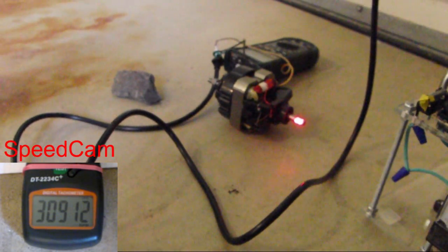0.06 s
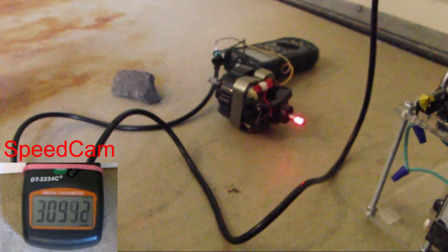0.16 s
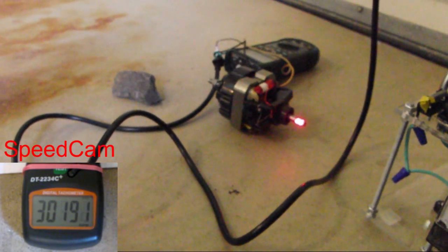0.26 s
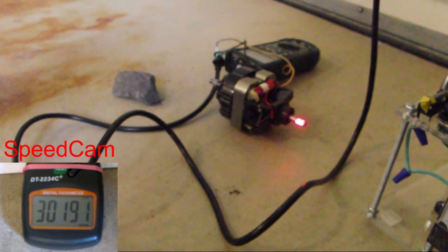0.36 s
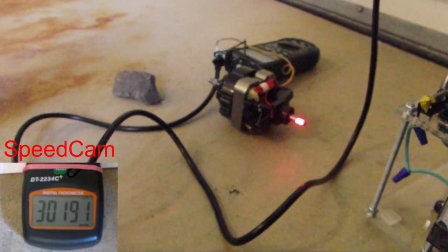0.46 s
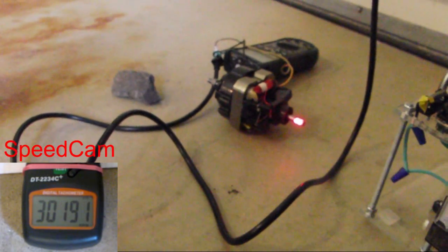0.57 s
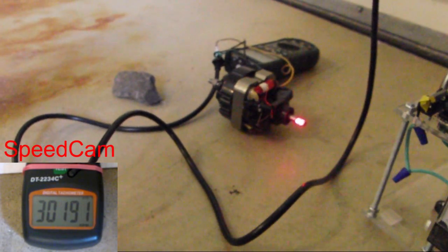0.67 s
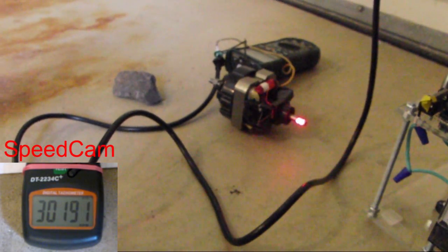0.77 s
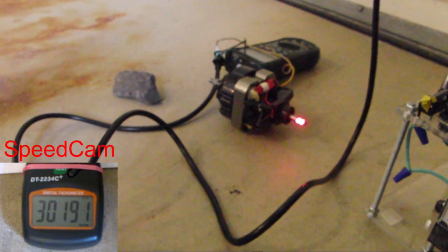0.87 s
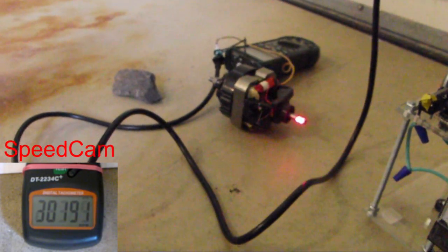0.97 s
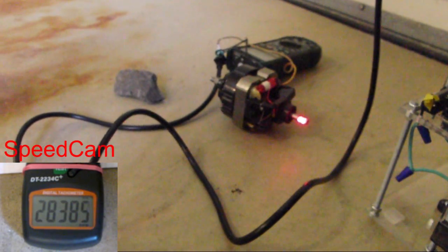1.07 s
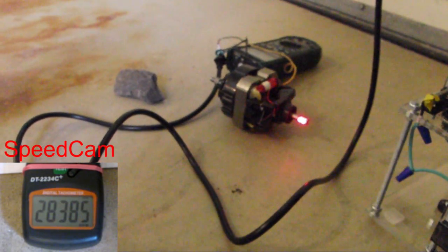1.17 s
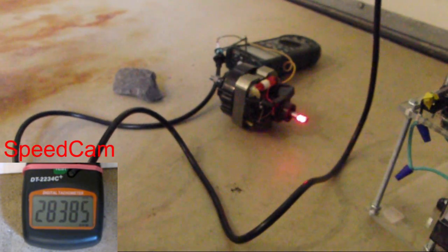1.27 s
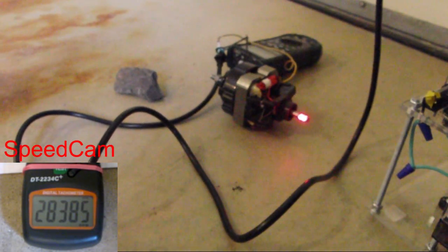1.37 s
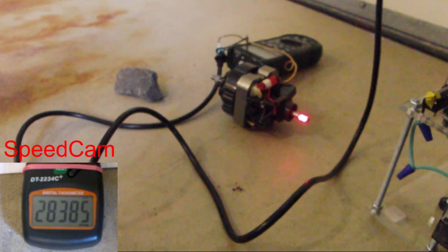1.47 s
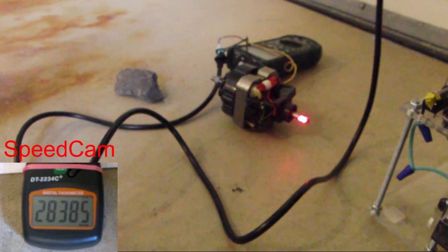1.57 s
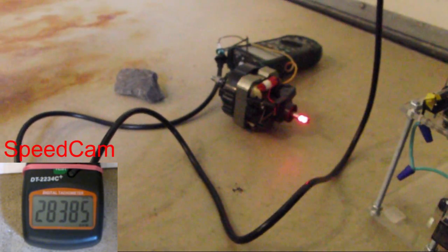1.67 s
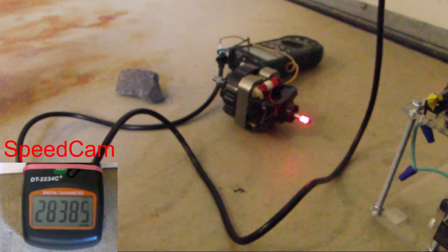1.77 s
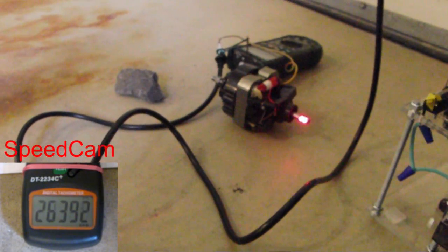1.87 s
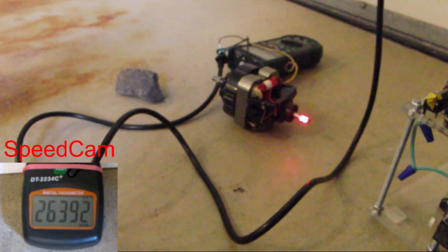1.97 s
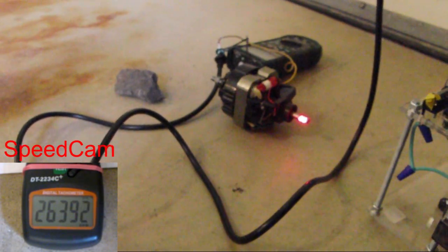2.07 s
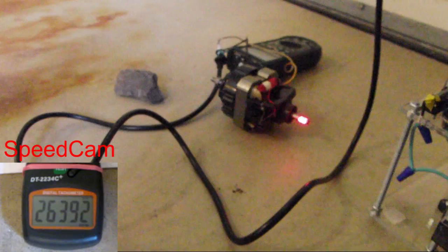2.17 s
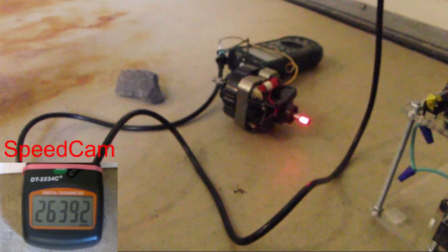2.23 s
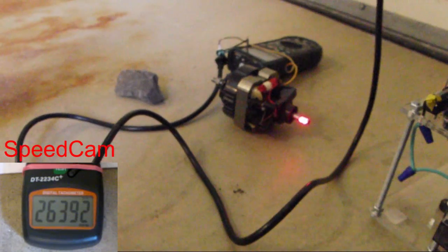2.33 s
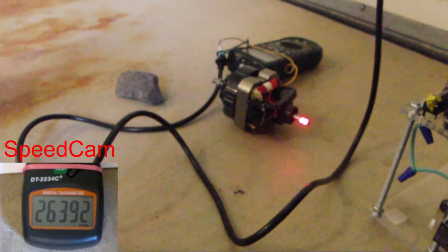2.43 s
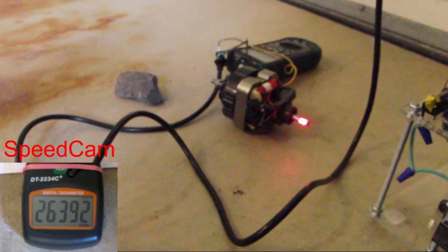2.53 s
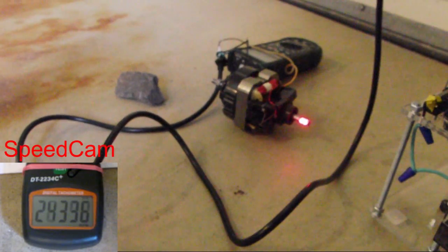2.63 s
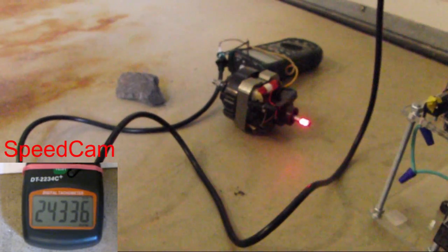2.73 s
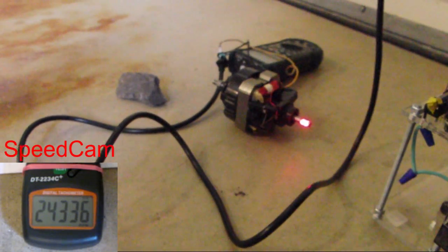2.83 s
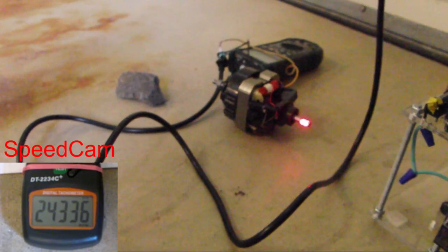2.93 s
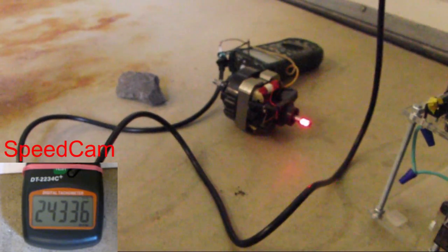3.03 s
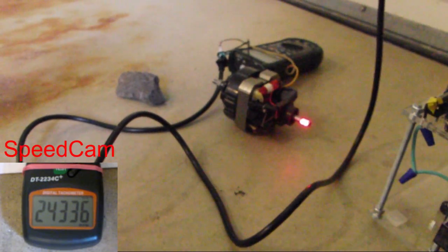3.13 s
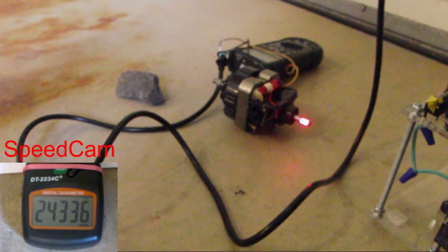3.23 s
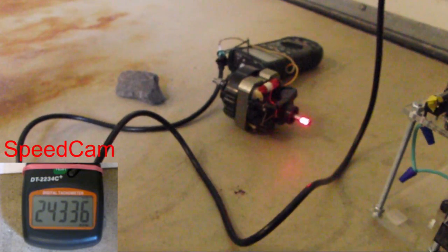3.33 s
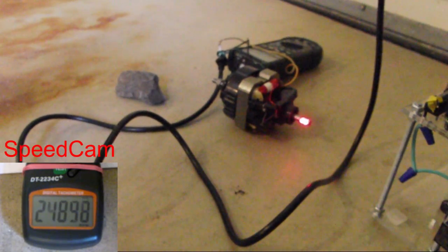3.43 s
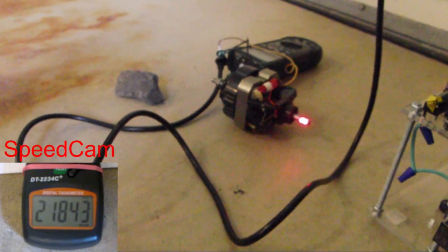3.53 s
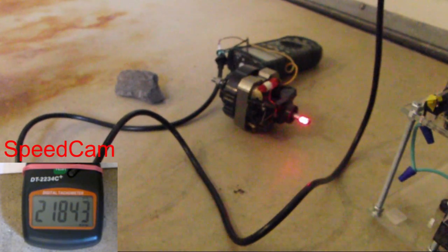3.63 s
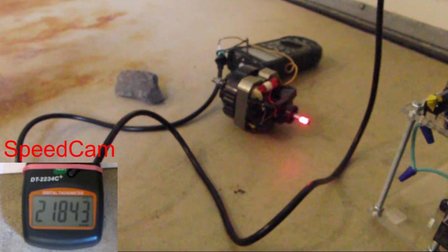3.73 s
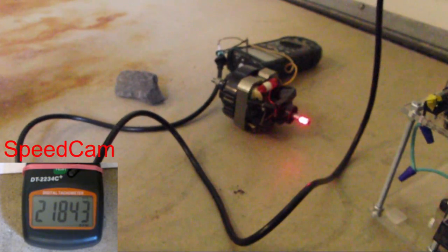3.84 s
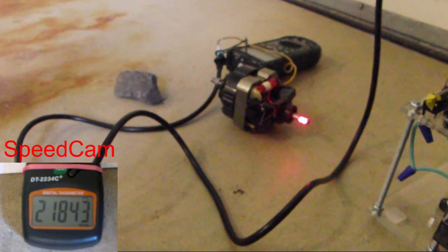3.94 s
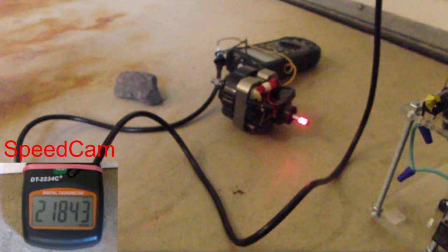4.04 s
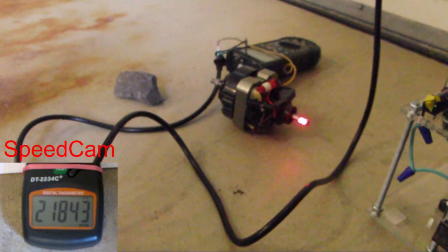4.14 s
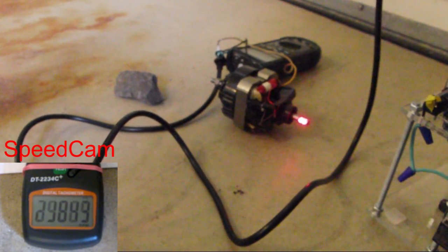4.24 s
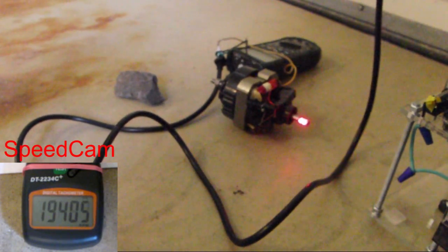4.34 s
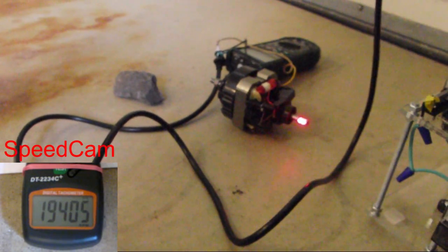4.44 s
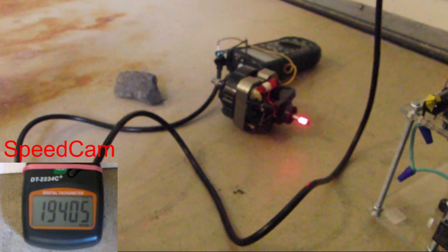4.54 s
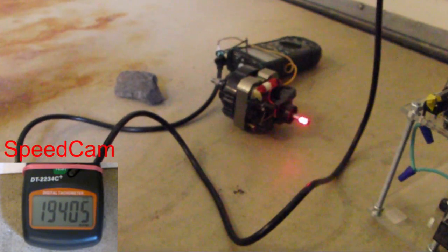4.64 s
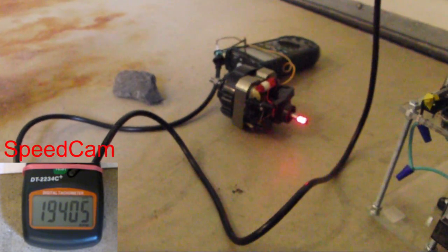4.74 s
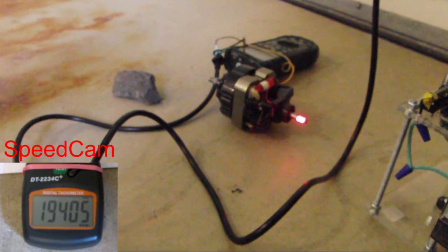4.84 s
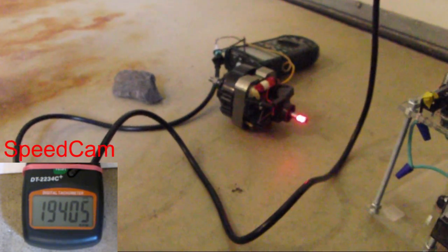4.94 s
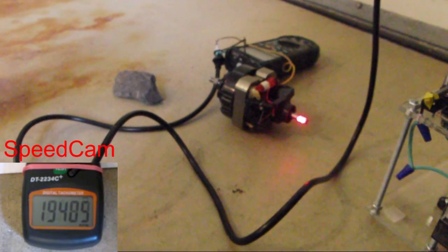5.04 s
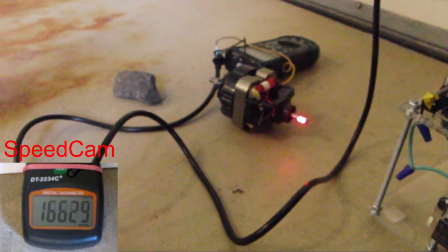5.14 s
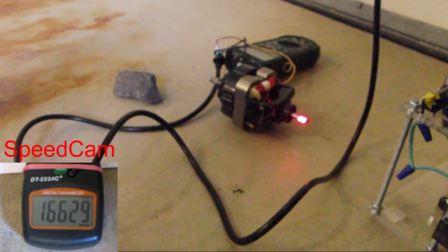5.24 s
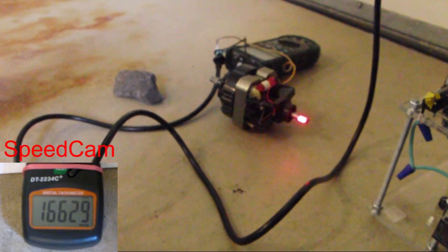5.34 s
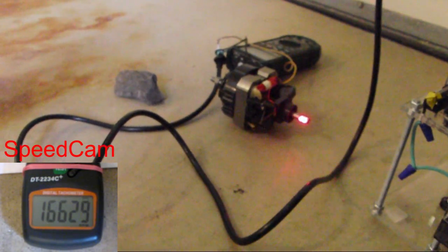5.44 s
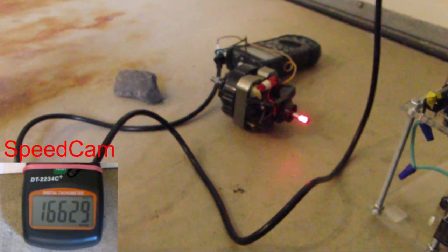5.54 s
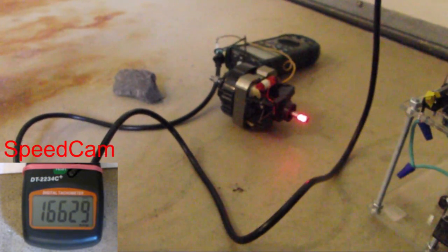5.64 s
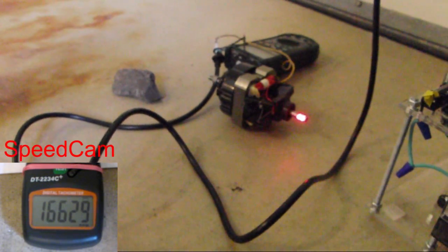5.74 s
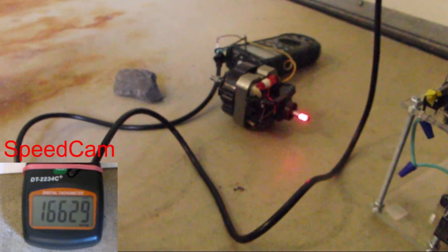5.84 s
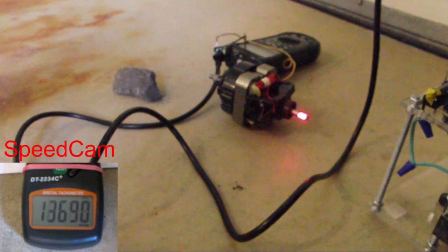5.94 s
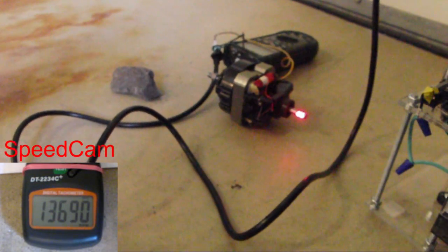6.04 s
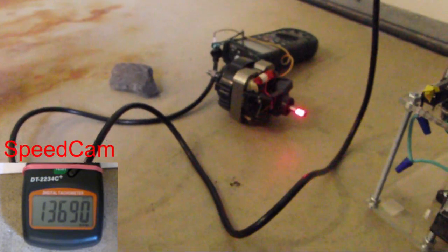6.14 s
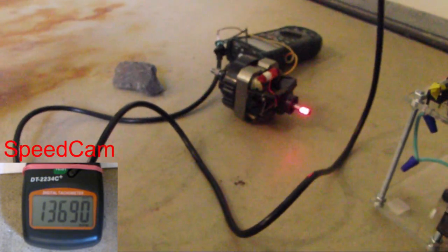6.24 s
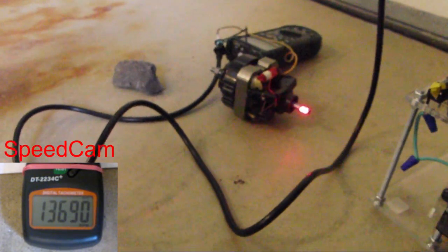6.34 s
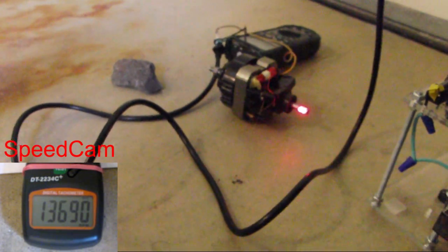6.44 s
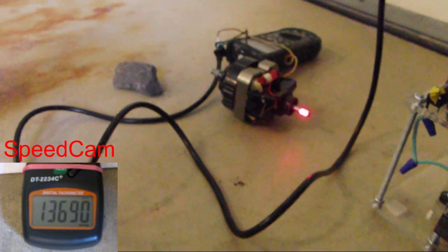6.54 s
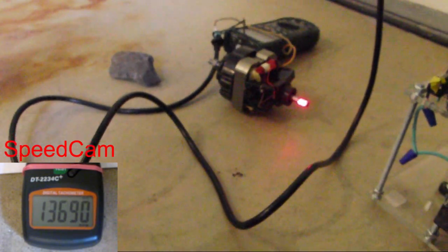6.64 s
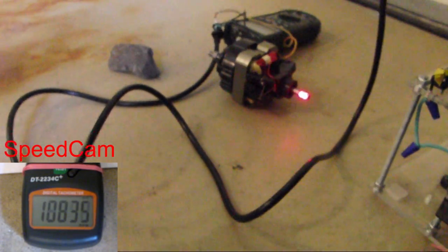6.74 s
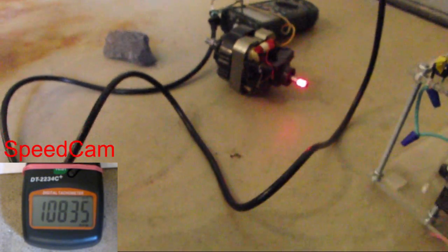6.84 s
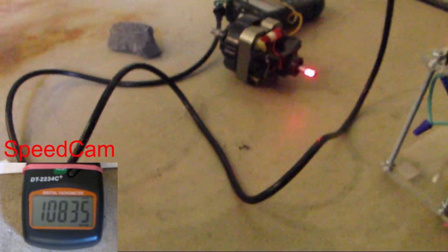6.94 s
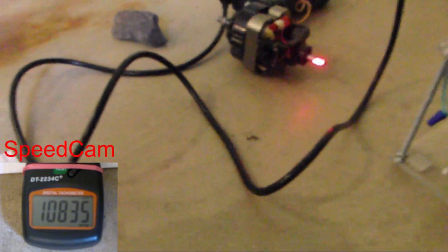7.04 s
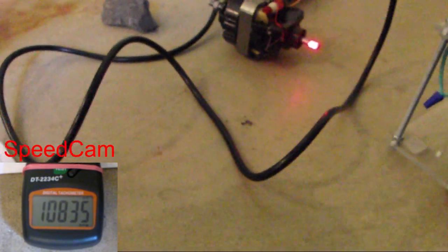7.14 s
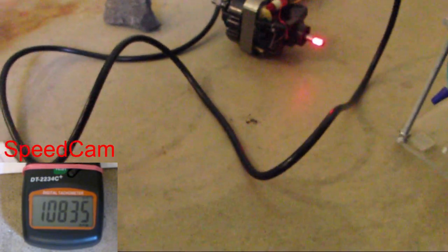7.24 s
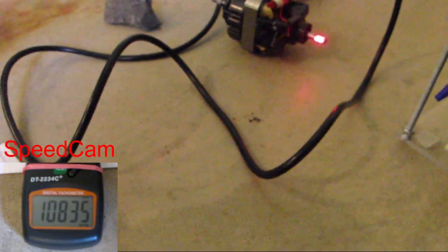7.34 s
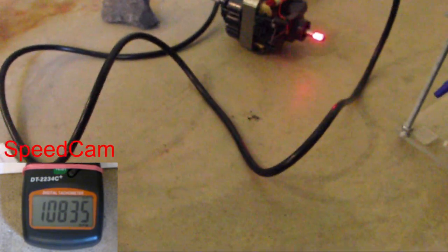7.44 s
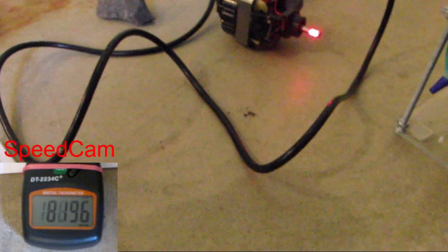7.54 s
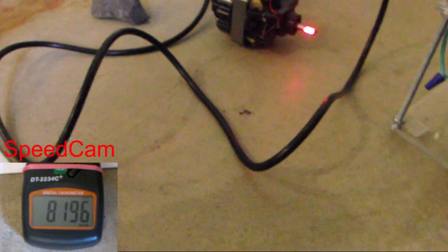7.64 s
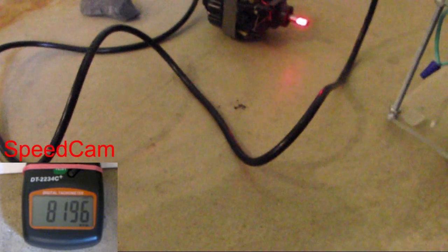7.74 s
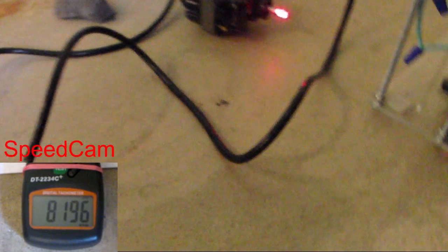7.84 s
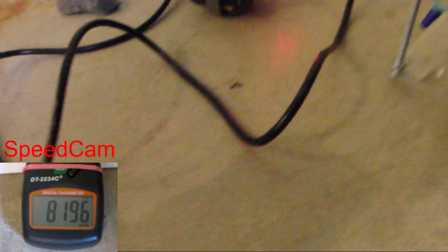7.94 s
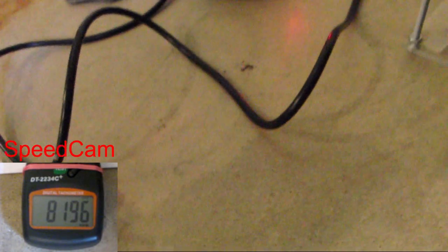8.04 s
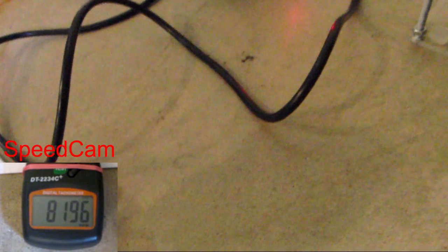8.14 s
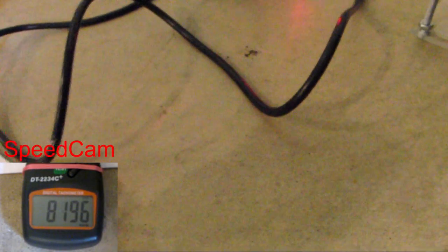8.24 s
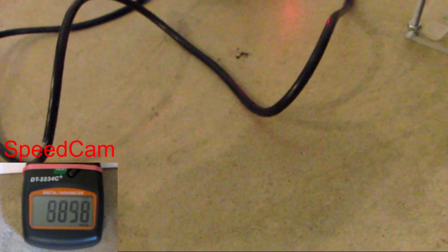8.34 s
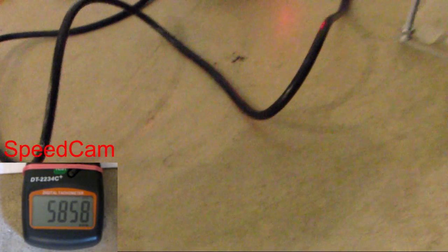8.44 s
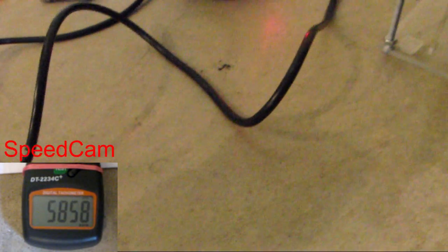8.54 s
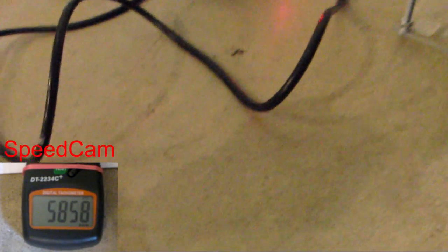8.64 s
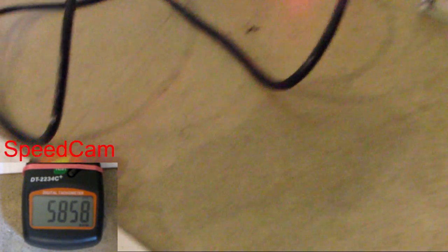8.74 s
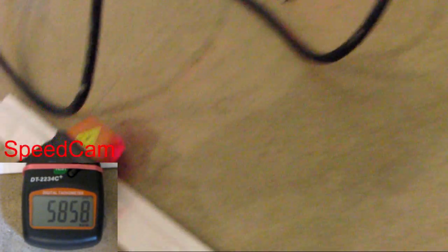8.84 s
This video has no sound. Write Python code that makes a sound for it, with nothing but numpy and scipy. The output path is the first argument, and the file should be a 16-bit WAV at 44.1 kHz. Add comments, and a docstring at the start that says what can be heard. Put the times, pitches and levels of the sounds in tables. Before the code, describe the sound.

Heard from close by in a small room, an electric motor winds down from very high speed to almost a standstill. Its piercing whine drops continuously while the brush hiss and bearing chatter grow softer and duller. As the motor quiets, a faint low hum emerges, and several light clicks, knocks and brief scuffs of handling sound over the last slow turns.

```python
"""On a table in a small room, heard close and in mono, a bare universal motor runs down from about
26000 rpm to a near standstill. Its twelve rotor slots whine, the carbon brushes hiss on the commutator
and the bearings rattle, all tied to the one shaft. As it quiets, a low hum comes forward
and there are a few light handling knocks and scuffs."""
import sys
import numpy as np
from scipy import signal
from scipy.fft import rfft, irfft, next_fast_len
from scipy.io import wavfile
from scipy.ndimage import uniform_filter1d, map_coordinates

SR = 44100
rng = np.random.default_rng(int(sys.argv[2]) if len(sys.argv) > 2 else 0)


def master_out(mix):
    """Clip the mix to full scale and print it as 16-bit PCM to the path in sys.argv[1]."""
    frames = np.transpose(np.atleast_2d(mix))
    ceiling = np.clip(frames, -1, 1)
    pcm = np.round(ceiling * 32767).astype(np.int16)
    wavfile.write(sys.argv[1], SR, pcm)


N = 392475
TOP_HZ = 15700

# The run-down that drives the motor. Each row: time in seconds, shaft turns per second.
RUN_DOWN = [(0.0, 436.4), (0.6, 409.7), (1.1, 383.5), (1.4, 367.1), (1.7, 353.5), (2.35, 320.8),
            (3.25, 269.2), (4.35, 201.8), (5.05, 162.7), (5.6, 133.6), (6.1, 109.6), (6.5, 91.4),
            (7.0, 69.7), (7.5, 49.1), (8.0, 29.0), (8.5, 12.0), (8.9, 2.0)]
# Shaft tones in cycles per turn: pole pull (2), undertone (6), a thin tone when fast (7),
# slot whine (12) and its octave (24).
TONE_ORDERS = [2, 6, 7, 12, 24]
# Their balance, in that order. Each row: level at top speed in dB, dB lost per octave of slowing.
TONE_LEVELS = [(3, -2), (-17.5, -3.5), (-18.5, 33), (0.57, 0.4), (-21, 4)]
# How well the motor radiates a tone. Each row: frequency in Hz, gain in dB.
RADIATION = [(200, -98), (500.0, -62.5), (1000.0, -48), (1700.0, -20.5), (3000.0, -26.0), (4400.0, -30.3),
             (5200.0, -30.5), (10000, -37)]
# Peaks and dips that swell and swallow the tones as they fall.
# Each row: centre and width in Hz, gain in dB.
TONE_PEAKS_AND_DIPS = [(1236.0, 370, 4), (1453, 130, -16), (1770, 127.0, 4), (1892, 160, -7),
                       (2152, 260, 9), (2295.0, 30, -20), (2535, 173, 8.4), (2732, 74, -11.5),
                       (2910, 200, 8.5), (3090, 71, -6.5), (3730, 180, 7.5), (4060, 163, -32),
                       (4577, 360, 12.5), (4688, 55, -18)]
# Slow drift in the brush level. Each row: time in seconds, offset in dB.
BRUSH_DRIFT = [(0, 0), (.8, 0.9), (1.8, -2.5), (3.3, 1.4), (4.2, 0), (5.1, .8), (5.8, -1.5), (6.6, 0.2),
               (7.3, -3.7), (8.25, .5), (8.5, -0.5), (8.72, -3.5)]
# The share of the rubbing that repeats every turn. Each row: turns per second, share in dB.
WHIRR_SHARE = [(10, -8), (55, -2), (100, -1), (170, -3), (260, -7), (420, -12)]
# Tone colours of the brush hiss, brush whirr, bearing rattle, scuffs and room noise.
# Each row: frequency in Hz, gain in dB.
HISS_EQ = [(200, -18.5), (900, -19), (1900, -14.5), (3200, -5), (5400, -10), (7000, -10.5), (9000, -3.5),
           (9800, -3), (10800, -4), (13000, 0.5), (14200, -4), (15700, -12)]
WHIRR_EQ = [(250, -19), (550, -6.5), (1000, -26), (1800, -12), (2900, -2), (3700, -5.5), (4500, -1.5),
            (5600, 3), (7000, -7.5), (8800, 3.5), (9800, 4.5), (10800, 1.5), (13000, -1.5), (15700, 2)]
RATTLE_EQ = [(100, -50), (250, -22.5), (450, -16.5), (650, -9.5), (950, -10), (1500, -5), (2000, 1),
             (2900, 1), (3700, -2), (4800, -8.5), (7000, -15), (15000, -51)]
SCUFF_EQ = [(400, -14), (1600, 0.5), (2800, 5), (6000, -8.5), (9000, -6), (13000, 4.5), (15700, 1)]
AIR_EQ = [(25, -11), (55, 0), (80, -5.5), (160, 4), (260, 0), (400, -2.5), (1000, -7), (3000, -7),
          (8000, -27), (15000, -24)]
# Brush holder modes where the whirr flares. Each row: centre and width in Hz, gain in dB.
HOLDER_MODES = [(1890, 190, 17.5), (2950, 390, 2.5), (3643, 270, 10.5), (4410, 52, 2.5), (5170, 210, 2)]
# Peaks and cancellations between frame and listener. Each row: centre and width in Hz, gain in dB.
FRAME_EQ = [(1154, 240, 6), (1696, 240, 7.5), (1913, 64, -5.5), (2113, 133, 5.5), (2540, 91, 2.5),
            (3020, 170, 1.5), (3750, 81, 5), (4050, 117, -17), (4440, 300, 3), (6270, 326, -17),
            (7860, 360, -13.5), (10180, 235, -28)]
# Frame modes that ring under slow friction. Each row: centre and width in Hz, relative level in dB.
FRAME_MODES = [(1896, 100, 0), (2900, 260, -6.5), (3670, 110, -7), (9500, 780, -9), (12800, 850, -1)]
# The table's answer to the rotor's unbalance. Each row: shaft rate in Hz, level in dB.
TABLE_SHAKE = [(90, -72), (110, -54), (126, -46.5), (150, -52), (190, -57), (220, -53.5), (340, -52.5),
               (436, -61.5)]
# Light knocks. Each row: start in seconds, peak of the sharp click in dB, peak of the dull thud in dB.
KNOCKS = [(6.786, -14, -58), (6.941, -20.5, -43), (7.068, -22, -47), (7.409, -24.5, -45), (7.425, -24, -42),
          (7.6889, -11.5, -31), (7.7103, -19, -33), (7.714, -26, -31), (7.814, -27, -36.5),
          (7.983, -27, -50), (8.365, -36, -32)]
# What a knock rings with. Each row: frequency in Hz, relative level in dB, seconds to fade by 60 dB.
CLICK_MODES = [(1300, -6, 0.0099), (1730, 8.5, 0.0055), (2250, 5.5, 0.0088), (2570, 7.5, 0.0071),
               (3070, 3, 0.011), (4520, 1, 0.0088), (5100, -10, 0.0073)]
THUD_MODES = [(230, -2, 0.074), (289, 2, 0.056), (394, -3, .07), (465, 1, 0.061), (704, -4, 0.07),
              (990, -5, 0.066)]
# Short scuffs and faint rumbles. Each row: centre in seconds, half length in seconds, level in dB.
SCUFFS = [(6.61, .015, -37), (7.015, 0.024, -31), (7.914, 0.018, -29.5)]
RUMBLES = [(5.15, 0.15, -59), (7.05, 0.18, -55), (8.2, 0.9, -55.5)]
# The hum's fader ride. Each row: time in seconds, level in dB.
HUM_RIDE = [(0, -65), (3, -64), (3.8, -56), (5.4, -50.5), (6.1, -52.5), (7.3, -45.5), (8.9, -46.5)]


def motor():
    """Every part follows the one shaft; returns the rubbing, the clear tones and their room send."""
    speed = uniform_filter1d(curve(RUN_DOWN), size=6000, mode="nearest")  # turns per second
    turns = np.cumsum(speed) / SR
    brush_db = -25.5 + curve(BRUSH_DRIFT) + slowing_db(speed, db_per_octave=4.4, full_speed=232)
    carbon = brushes(speed, turns, brush_db) + commutator(speed, turns, brush_db)
    sliding = speed / np.hypot(speed, 2.7)  # the brushes stop sliding freely near 2.7 turns a second
    rub = sliding * carbon + bearings(speed)
    tones, room_send = whine(speed, turns)
    return resonant(rub, FRAME_EQ) + frame_ring(speed), tones + unbalance(speed, turns), room_send


def whine(speed, turns, flutter_db=2.4, fast_flutter_db=1.5, waver_rad=0.43):
    """Shaft tones swell and dip as they fall, fluttering with the shaft's play: direct and room send."""
    play = np.sqrt(speed / speed.max())
    flutter = play * (flutter_db * wobble(45) + fast_flutter_db * wobble(170))
    waver = waver_rad * play * wobble(70)
    direct, room_send = np.zeros(N), np.zeros(N)
    for order, (db, db_per_octave) in zip(TONE_ORDERS, TONE_LEVELS):
        hz = order * speed
        level_db = db + slowing_db(speed, db_per_octave, speed.max()) + along(RADIATION, hz) + flutter
        tone = amp(level_db) * np.sqrt(2) * np.sin(2 * np.pi * order * turns + waver)
        eq_db = peaks_db(TONE_PEAKS_AND_DIPS, hz)
        direct += amp(eq_db) * tone
        room_send += amp(np.minimum(eq_db, 0)) * tone  # the peaks beam at the listener, not the walls
    return direct, room_send


def brushes(speed, turns, brush_db, throb_db=1.17, oval_db=1.2):
    """Carbon rubs on copper: hiss and worn-track whirr, pressed harder once and twice a turn."""
    angle = 2 * np.pi * turns
    pressure = amp(brush_db + throb_db * np.sin(angle) + oval_db * np.sin(2 * angle) + 0.65 * wobble(25))
    share = amp(np.interp(speed, *np.transpose(WHIRR_SHARE)))
    bumps = metal_ring(worn_track(speed, turns))
    whirr = share * coloured(resonant(bumps, HOLDER_MODES), WHIRR_EQ)
    hiss = np.sqrt(1 - share ** 2) * coloured(rng.standard_normal(N), HISS_EQ)
    return pressure * (hiss + whirr)


def worn_track(speed, turns, count=384):
    """The same ring of bumps comes round on every turn: a comb of shaft overtones."""
    order = np.arange(count // 2 + 1)
    # two opposite brushes meet each bump twice a turn, so even overtones lead
    comb_db = -8 * (order % 2) + 1.5 * (order % 8 == 0) + 1.5 * rng.standard_normal(len(order))
    profile = irfft(amp(comb_db) * np.exp(2j * np.pi * rng.random(len(order))), count)
    passes = np.arange(int(turns[-1]) + 1)[:, None] + np.arange(count) / count
    when = np.interp(passes, turns, np.arange(N), right=N).ravel()
    height = np.broadcast_to(profile, passes.shape).ravel()
    sample, fraction = when.astype(int), when % 1  # each bump is split between two samples
    bumps = np.bincount(sample, height * (1 - fraction), N)[:N]
    bumps += np.bincount(sample + 1, height * fraction, N)[:N]
    return unit(bumps / np.sqrt(speed))


def metal_ring(x, t60=0.057, wet_db=-4):
    """Many close, damped modes of the metal: a falling overtone flares briefly in each."""
    t = np.arange(SR // 10) / SR
    tail = rng.standard_normal(len(t)) * amp(-60 * t / t60)
    return x + amp(wet_db) * convolved(x, tail)


def commutator(speed, turns, brush_db, bars=16, overtones=16, ring_hz=12660, width_hz=1400, floor_db=-33.5):
    """Uneven bar edges tick under the brushes; overtones light up passing the holder's resonance."""
    ticks = np.zeros(N)
    skip = wobble(60)
    runout = 0.09 * np.sin(2 * np.pi * turns)
    for k in range(1, overtones + 1):
        order = bars * k
        hz = order * speed
        gain = amp(floor_db) + bell(hz, ring_hz, width_hz)
        phase = 2 * np.pi * order * turns + k * runout + 0.5 * np.roll(skip, k * SR)
        ticks += (hz < TOP_HZ) * gain * np.sin(phase)
    return amp(brush_db + 1.4 * wobble(30)) * (speed / speed.max()) ** 0.44 * ticks


def bearings(speed, chatter_db=1.5, dull_hz=1630):
    """The shaft chatters irregularly in its bearings, softer and duller as it slows."""
    bright = coloured(rng.standard_normal(N) * amp(chatter_db * wobble(700)), RATTLE_EQ)
    dull = unit(filtered(bright, lambda hz: 1 / (1 + (hz / dull_hz) ** 2)))
    fast = np.interp(speed, [150, 330], [0, 1])
    level_db = -24.3 + slowing_db(speed, db_per_octave=9.6, full_speed=345) + 0.22 * wobble(21.9)
    return amp(level_db) * (fast * bright + (1 - fast) * dull)


def frame_ring(speed, peak_db=-39, peak_speed=52, width_octaves=0.84):
    """Slow friction keeps a few frame modes singing, loudest around one shaft speed."""
    def response(hz):
        return sum(amp(db) * bell(hz, centre, width) for centre, width, db in FRAME_MODES)
    swell = np.exp(-(np.log2(speed / peak_speed) / width_octaves) ** 2)
    return amp(peak_db) * swell * unit(filtered(rng.standard_normal(N), response))


def unbalance(speed, turns):
    """The rotor shakes the table once a turn."""
    level_db = along(TABLE_SHAKE, speed) + 1.15 * wobble(18)
    return amp(level_db) * np.sqrt(2) * np.sin(2 * np.pi * turns + 0.15 * wobble(25))


def handling():
    """Light knocks, each a click layered on a thud and tuned a little differently, and brief scuffs."""
    knocks, t = np.zeros(N + SR), np.arange(SR // 4) / SR
    for start, click_db, thud_db in KNOCKS:
        for modes, peak_db in (CLICK_MODES, click_db), (THUD_MODES, thud_db):
            ring = np.zeros(len(t))
            for hz, db, t60 in modes:
                attack = 1 - np.exp(-2 * hz * t)
                decay = amp(db + rng.normal(0, 2.0) - 60 * t / t60)
                ring += attack * decay * np.sin(2 * np.pi * hz * rng.normal(1, 0.074) * t)
            knocks[round(start * SR):][:len(t)] += amp(peak_db) * ring / np.abs(ring).max()
    scuffs = swells(SCUFFS) * coloured(rng.standard_normal(N), SCUFF_EQ)
    return knocks[:N] + scuffs


def room(x, t60, wet_db):
    """A short answer from the table and the walls, after a 3 ms pre-delay."""
    t = np.arange(SR // 3) / SR
    tail = rng.standard_normal(len(t)) * amp(-60 * t / t60) * (t > 0.003)
    return amp(wet_db) * convolved(x, tail)


def rumble():
    """Faint swells of low noise, weighted around 70 Hz."""
    return swells(RUMBLES) * coloured(rng.standard_normal(N), [(25, -11), (70, 6), (300, -15), (1500, -70)])


def room_tone(hum_hz=111.8, octave_db=-16.5, air_db=-51.5):
    """A slightly unsteady hum over a bed of soft room noise that rises a little with it."""
    hum_db = curve(HUM_RIDE)
    phase = 2 * np.pi * hum_hz * np.arange(N) / SR + 0.17 * wobble(5.4)
    hum = np.sqrt(2) * (np.sin(phase) + amp(octave_db) * np.sin(2 * phase + 0.6 * wobble(11)))
    air = coloured(rng.standard_normal(N), AIR_EQ)
    return amp(hum_db + 0.8 * wobble(7.4)) * hum + amp(air_db + 0.16 * (hum_db - hum_db.max())) * air


def amp(db):
    """Decibels to gain."""
    return 10 ** (np.asarray(db) / 20)


def unit(x):
    """Scale to rms 1."""
    return x / np.sqrt(np.mean(x ** 2) + 1e-20)


def curve(rows):
    """An automation line through (seconds, value) points."""
    return np.interp(np.arange(N) / SR, *np.transpose(rows))


def wobble(rate):
    """A smooth random curve, rate knots a second."""
    return map_coordinates(rng.standard_normal(int(N * rate / SR) + 4), [np.arange(N) * rate / SR])


def swells(rows):
    """A gain envelope of rounded swells."""
    t = np.arange(N) / SR
    return sum(amp(db) * np.exp(-((t - centre) / half) ** 4) for centre, half, db in rows)


def slowing_db(speed, db_per_octave, full_speed):
    """Level change: flat above full speed, a fixed step for each octave below."""
    return db_per_octave * np.log2(np.minimum(speed / full_speed, 1))


def along(points, hz):
    """(Hz, value) points read on a log axis."""
    point_hz, value = np.transpose(points)
    return np.interp(np.log(hz + 1), np.log(point_hz), value)


def bell(hz, centre, width):
    """A resonance curve: 1 at the centre, half at half a width away."""
    return 1 / (1 + (2 * (hz - centre) / width) ** 2)


def peaks_db(modes, hz):
    """The boost or cut that a set of peaks and notches gives at hz."""
    return sum(db * bell(hz, centre, width) for centre, width, db in modes)


def filtered(x, response):
    """x through a gain that depends on frequency."""
    size = next_fast_len(N + SR // 2)
    return irfft(rfft(x, size) * response(np.fft.rfftfreq(size, 1 / SR)), size)[:N]


def coloured(x, points):
    """x through an EQ curve of (Hz, dB) points, at rms 1."""
    return unit(filtered(x, lambda hz: amp(along(points, hz))))


def resonant(x, modes):
    """x through fixed peaks and notches."""
    return filtered(x, lambda hz: amp(peaks_db(modes, hz)))


def convolved(x, tail):
    """x smeared by a tail of unit energy."""
    return signal.fftconvolve(x, tail / np.linalg.norm(tail))[:N]


def scene():
    """The motor and the handling in a small room, alike in both channels."""
    rub, tones, room_send = motor()
    near = rub + handling()
    walls = room(near, t60=0.58, wet_db=-11.5) + room(room_send, t60=0.61, wet_db=-9)
    mono = near + tones + walls + rumble() + room_tone()
    return np.array([mono, mono])


def record(dry):
    """A brick-wall cut of everything above TOP_HZ."""
    return np.array([filtered(channel, lambda hz: hz < TOP_HZ) for channel in dry])


dry = scene()
out = record(dry)
master_out(out)
```